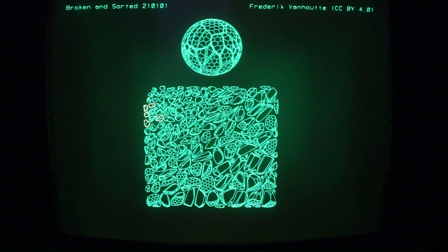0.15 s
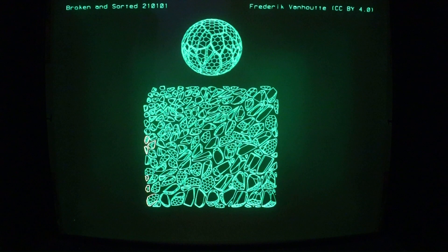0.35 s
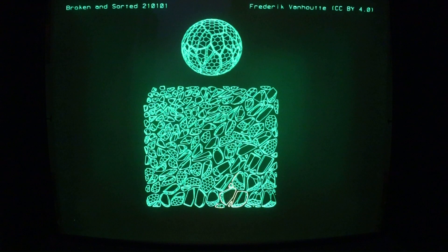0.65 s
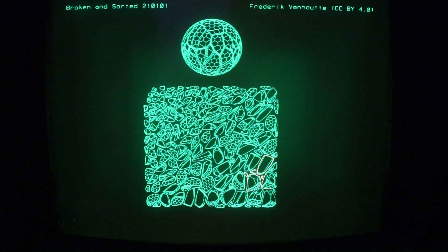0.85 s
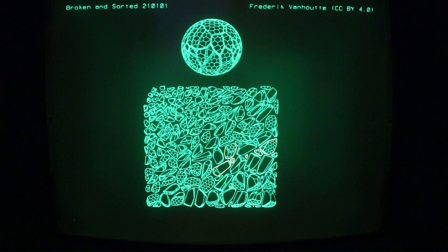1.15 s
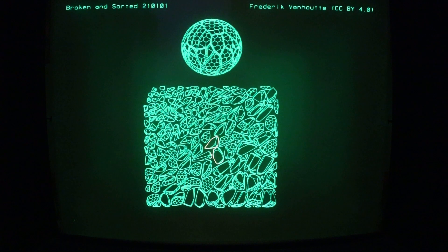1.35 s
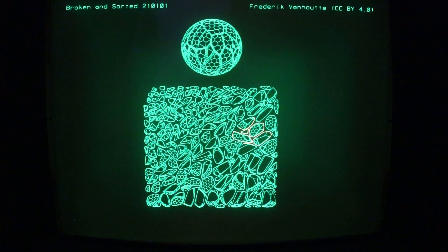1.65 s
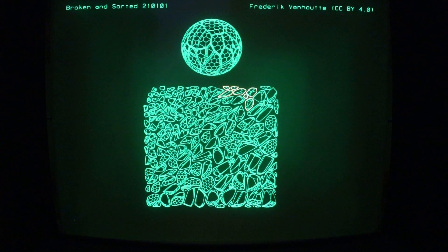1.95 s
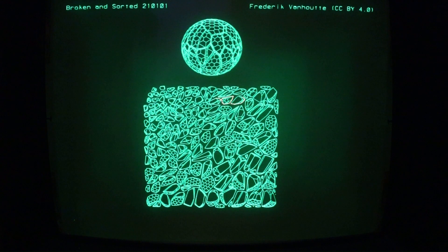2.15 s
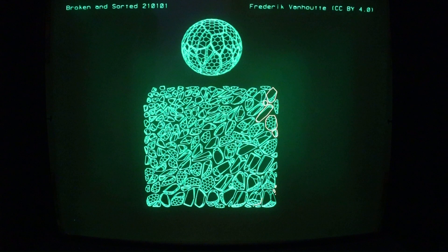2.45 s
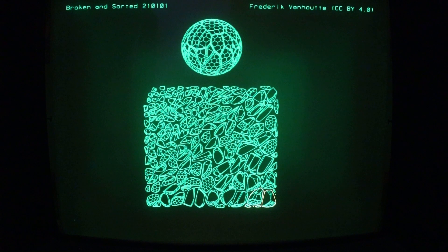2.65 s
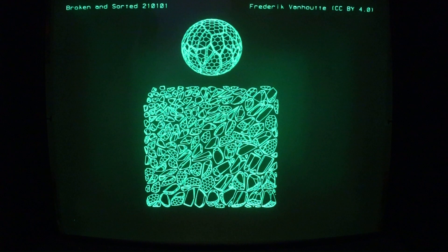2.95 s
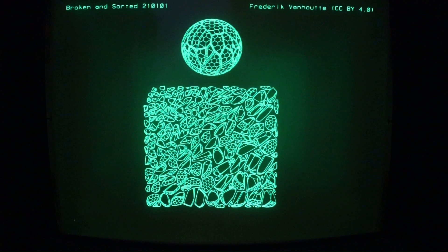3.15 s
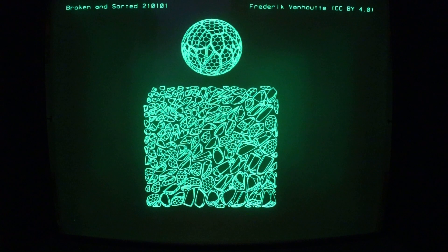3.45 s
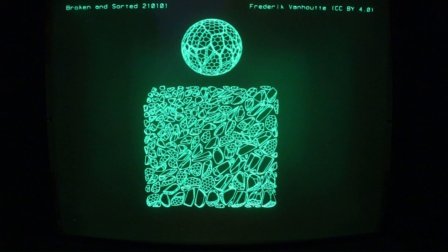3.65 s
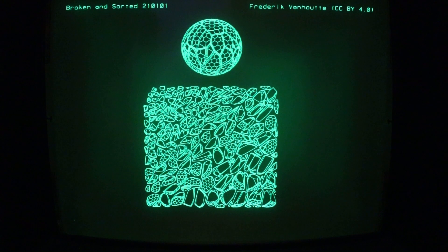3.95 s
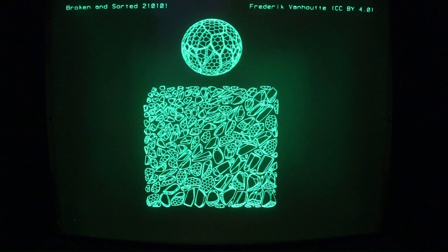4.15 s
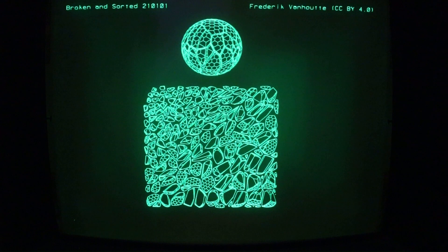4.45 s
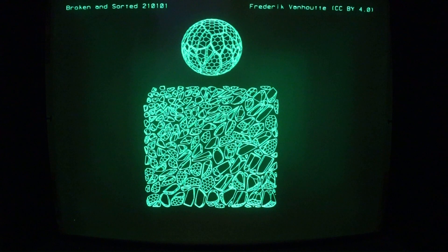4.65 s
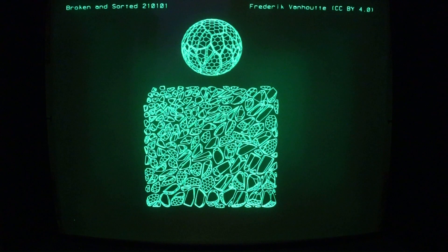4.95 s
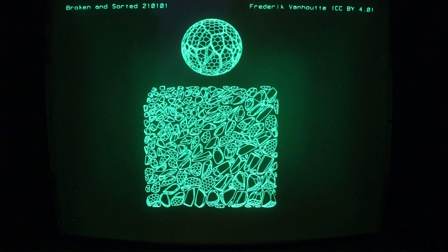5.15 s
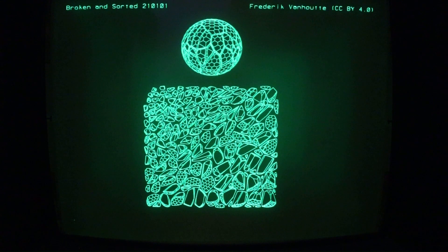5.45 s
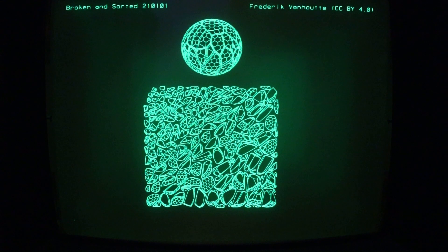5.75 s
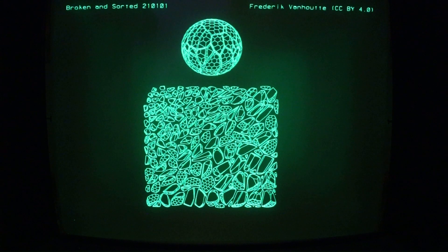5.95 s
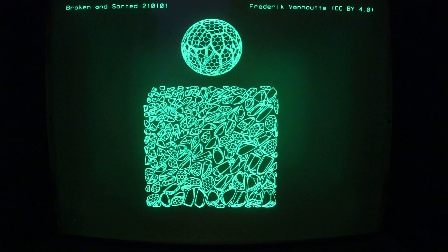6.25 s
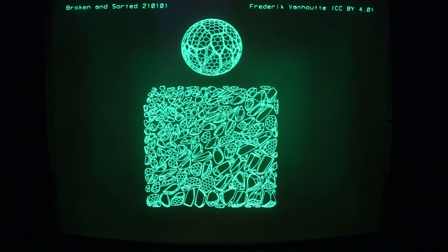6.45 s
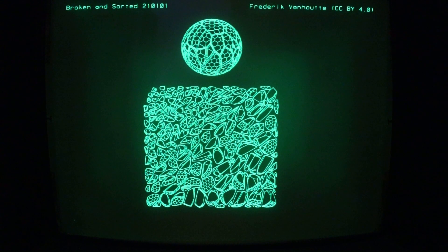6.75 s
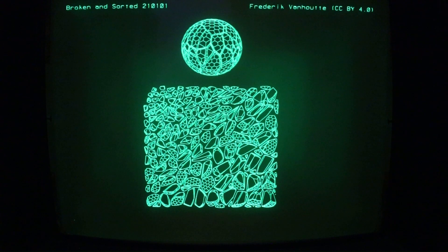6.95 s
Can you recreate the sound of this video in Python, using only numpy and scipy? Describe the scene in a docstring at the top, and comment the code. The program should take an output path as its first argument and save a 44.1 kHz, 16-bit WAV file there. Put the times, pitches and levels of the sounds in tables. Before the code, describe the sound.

An old computer is already running in a quiet indoor room, heard close in stereo for about seven seconds. Two cooling fans give a steady drone of several even tones, from a low hum around 120 to 150 hertz up to a clear nasal note near 550 to 670. Transformer hum beats slowly with them. Soft airflow rushes underneath, boxy and dull, wider in its upper part, with barely audible thin high whines. Faint brushes of treble rustle come at about 0.3 and 0.7 seconds, each gone in an instant. From 2 to 6 seconds the slower fan sags minutely in pitch and grows slightly fuller, easing back near 7. Another faint rustle passes at 3.3, then slightly clearer ones at 4.9, 5.4 and 6.3. The hum continues unbroken to the end.

```python
"""An old computer runs in a quiet room, heard by a close pair of microphones. From the start two mains-driven
fans turn almost steadily: each sings multiples of its shaft speed, some shifted by the magnetic pull at twice
the mains frequency. The transformer hums at multiples of that pull, thin whines sit on top as lone wandering
sines, and air rushes as shaped noise lifted by case and room resonances.
Now and then, first within the opening second, a faint rustle swells and fades as treble noise."""
import sys
import numpy as np
from scipy import signal
from scipy.fft import rfft, irfft, next_fast_len
from scipy.io import wavfile
from scipy.ndimage import uniform_filter1d, map_coordinates

SR = 44100
rng = np.random.default_rng(int(sys.argv[2]) if len(sys.argv) > 2 else 0)


def volts(x):
    """Linear amplitude factor 10**(x/20) for a level x in dB, scalar or array-like."""
    e = np.asarray(x, float) / 20
    return 10 ** e


def generate_wav(signal):
    """Clip the signal to [-1, 1] and save it as 16-bit WAV at the path in sys.argv[1]."""
    frames = np.transpose(np.atleast_2d(signal))
    scaled = np.clip(frames, -1, 1) * 32767
    pcm = np.round(scaled).astype(np.int16)
    wavfile.write(sys.argv[1], SR, pcm)


N = 313110  # samples


def along(points, hz):
    """Reads a curve of (Hz, value) points on a logarithmic frequency axis."""
    point_hz, value = np.transpose(points)
    return np.interp(np.log(hz + 1), np.log(point_hz + 1), value)


def wobble(knots_per_s):
    """A smooth random curve through normally distributed knots."""
    knots = rng.standard_normal(int(N * knots_per_s / SR) + 4)
    return map_coordinates(knots, [np.arange(N) * knots_per_s / SR])


def filtered(x, response):
    """Shapes x by a gain that depends on frequency."""
    size = next_fast_len(N + 8192)
    hz = np.fft.rfftfreq(size, 1 / SR)
    return irfft(rfft(x, size) * response(hz), size)[..., :N]


def tone(turns, left_db, right_db, lead_rad):
    """A sine at both microphones from its running count of cycles; levels are rms."""
    level = np.sqrt(2) * volts([[left_db], [right_db]])
    return level * np.cos(2 * np.pi * turns + [[lead_rad / 2], [-lead_rad / 2]])


def motor(shaft_turns, tones, unsteady_db):
    """Multiples of shaft speed, shifted up or down by the magnetic pull; each tone wavers in level."""
    pull_hz = 120.03  # twice the mains frequency
    pull_turns = pull_hz * np.arange(N) / SR
    total = 0
    for shaft_multiple, pull_multiple, *heard in tones:
        # in cycles: the case spreads the tones, so they never peak together
        lag = .0135 * shaft_multiple ** 2 - .09 * pull_multiple ** 2
        turns = shaft_multiple * shaft_turns + pull_multiple * pull_turns + lag
        total = total + volts(unsteady_db * wobble(2.97)) * tone(turns, *heard)
    return total


def fast_fan():
    """The faster fan loses speed very slowly, so its tones sink slightly in pitch."""
    start_turns_per_s, sag_per_s = 51.315, .0055  # sag in turns/s lost each second
    # fan tones, levels before the waver:
    # shaft_multiple, pull_multiple, left_db (rms), right_db (rms), left_lead_rad
    fan_tones = [(1.0, 0.0, -61.0, -61.0, -0.0), (3.0, 0.0, -40.0, -39.0, 0.0),
                 (5.0, 0.0, -51.0, -50.0, 0.0), (6.0, 0.0, -39.0, -39.0, -0.1),
                 (9.0, 0.0, -43.0, -44.0, 0.2), (9.0, 1.0, -56.0, -55.0, 0.1),
                 (11.0, 0.0, -58.0, -59.0, -0.1), (12.0, 0.0, -60.0, -57.0, 0.1),
                 (13.0, -1.0, -39.0, -40.0, -0.1), (13.0, 0.0, -38.0, -37.0, 0.7),
                 (13.0, 1.0, -51.0, -44.0, -0.0), (14.0, 0.0, -64.0, -65.0, 0.5),
                 (15.0, 0.0, -59.0, -56.0, 0.5), (18.0, 0.0, -61.0, -69.0, 1.2),
                 (20.0, 0.0, -81.0, -74.0, 0.3)]
    speed = start_turns_per_s - sag_per_s * np.arange(N) / SR
    return motor(np.cumsum(speed) / SR, fan_tones, unsteady_db=0.37)


def slow_fan():
    """The slower fan drifts in speed and grows louder as it slows."""
    start_turns = .15  # shaft angle at the start; the fan beats with the transformer
    swell_db_per_turn = 13  # dB for each turn/s under its mean speed
    # drift of the shaft speed: time_s, speed_turns_per_s
    speed_curve = [(0, 39.275), (2.2, 39.262), (4.1, 39.185), (6.1, 39.148), (7.1, 39.21)]
    # fan tones, levels before swell and waver:
    # shaft_multiple, pull_multiple, left_db (rms), right_db (rms), left_lead_rad
    fan_tones = [(3.0, 0.0, -43.0, -43.0, 0.0), (6.0, 0.0, -46.0, -46.0, 0.0),
                 (9.0, 0.0, -51.0, -57.0, -0.0), (12.0, 0.0, -53.0, -59.0, -0.3),
                 (12.0, 1.0, -63.0, -63.0, 0.4), (13.0, 0.0, -62.0, -60.0, 1.7),
                 (13.0, 1.0, -41.0, -42.0, 0.3), (13.0, 2.0, -52.0, -59.0, -0.4),
                 (13.0, 3.0, -73.0, -60.0, 0.6), (21.0, 0.0, -63.0, -57.0, 0.6),
                 (27.0, 0.0, -61.0, -60.0, 0.8), (30.0, 0.0, -85.0, -65.0, 0.4),
                 (36.0, 0.0, -65.0, -63.0, 0.3), (45.0, 0.0, -70.0, -67.0, 0.3)]
    speed = np.interp(np.arange(N) / SR, *np.transpose(speed_curve))
    swell = volts(swell_db_per_turn * (speed.mean() - speed))
    return swell * motor(np.cumsum(speed) / SR + start_turns, fan_tones, unsteady_db=1.0)


def transformer():
    """The transformer has no shaft: it hums at plain multiples of the magnetic pull."""
    # hum tones, levels before the waver:
    # shaft_multiple, pull_multiple, left_db (rms), right_db (rms), left_lead_rad
    hum_tones = [(0.0, 1.0, -41.0, -41.0, 0.0), (0.0, 2.0, -51.0, -50.0, 0.2),
                 (0.0, 3.0, -55.0, -55.0, 0.1), (0.0, 4.0, -58.0, -58.0, -0.3),
                 (0.0, 6.0, -61.0, -64.0, 0.4)]
    return motor(0, hum_tones, unsteady_db=1.6)


def whines():
    """Lone sines whose pitch wanders slightly."""
    # thin whines: pitch_hz, left_db (rms), right_db (rms), left_lead_rad, wander_hz
    whine_tones = [(214.45, -49, -49, .1, .15), (1026.8, -64, -61, .4, .6), (2269, -73, -69, .8, 3),
                   (5152, -84, -84, 0, 3), (8985, -90, -90, 3.1, 3), (10670, -94, -89, 2.8, 2),
                   (11484, -87, -87, 3, 3)]
    total = 0
    for pitch_hz, *heard, wander_hz in whine_tones:
        pitch = pitch_hz + wander_hz * wobble(4)
        total = total + tone(np.cumsum(pitch) / SR, *heard)
    return total


def rush(spectrum, peaks, patchy_db):
    """Turbulent noise with faint patches of random gain, lifted at flat-topped resonances."""
    bins = signal.stft(rng.standard_normal(N), nperseg=512)[2]
    # each patch spreads over 40 frequency bins and 6 time frames
    patches = uniform_filter1d(rng.standard_normal(bins.shape), 40, 0)
    patches = uniform_filter1d(patches, 6, 1)
    gain = volts(patchy_db * patches / patches.std())
    noise = signal.istft(bins * gain, nperseg=512)[1][:N]

    def response(hz):
        lift = 1  # in power
        for center_hz, width_hz, added_db in peaks:
            lift = lift + volts(added_db) ** 2 / (1 + (2 * (hz - center_hz) / width_hz) ** 4)
        return volts(along(spectrum, hz)) * np.sqrt(lift * SR / 2)

    return filtered(noise / noise.std(), response)


def air():
    """Low air noise reaches both microphones alike; the treble arrives from the sides, partly opposed."""
    # air noise alike at both microphones, before resonances and tilt: pitch_hz, level_db (per Hz)
    common_spectrum = [(22, -81), (50, -75.5), (95, -78.5), (140, -62.5), (270, -73.5), (400, -72),
                       (800, -73.5), (1150, -79.5), (1750, -86), (3000, -87), (5700, -102), (8500, -108),
                       (10800, -108.5), (11600, -114.5), (13000, -119), (14500, -129)]
    # air noise opposed between the microphones, before resonances and tilt: pitch_hz, level_db (per Hz)
    opposed_spectrum = [(22, -103), (50, -97), (115, -85.5), (200, -79), (400, -80.5), (800, -83.5),
                        (1150, -82), (1750, -84.5), (3000, -85), (5500, -96), (8500, -103), (10500, -103),
                        (12500, -112), (15000, -119)]
    # case and room resonances of each part: center_hz, width_hz, added_db (added power over that noise)
    common_peaks = [(83.4, 36, 9), (114.2, 15, 16.5), (171.3, 7.9, 14.5), (197.8, 19, 12),
                    (234.5, 14.6, 15.5), (256, 15.6, 11.5), (296.8, 31, 14), (329, 3.4, 13), (341, 43, 8),
                    (385, 17, 4.5), (435, 10, 4), (475.4, 20, 7.5), (525, 19.6, 8.5), (579, 18, 8),
                    (682, 40, 3), (773, 70, 0), (983, 18, 9), (986, 120, 1.5), (1305, 33, 1.4),
                    (1478, 134, 3), (1616, 104, 2), (1754, 15, 10.5), (1993, 80, 3.5), (1860, 30, 5),
                    (1923, 70, 2), (2210, 190, 2.5), (2426, 77, 2.5), (4700, 1160, -1.5)]
    opposed_peaks = [(154, 45, 7), (273, 20, 2), (356, 29, 3), (413, 45, 7), (489, 40, 0), (721, 240, 2),
                     (970, 72, 4.5), (1463, 130, 0), (2213, 130, .1), (3255, 164, -8)]
    # balance of the microphones: pitch_hz, left_minus_right_db
    balance = [(60, 0.5), (130, -1.0), (270, 0.0), (590, 0), (1260, -1.5), (2690, -2), (5760, -0.5),
               (12300, -1)]
    common = rush(common_spectrum, common_peaks, patchy_db=0.6)
    opposed = rush(opposed_spectrum, opposed_peaks, patchy_db=0.35)
    pair = np.array([common + opposed, common - opposed])
    return filtered(pair, lambda hz: volts(along(balance, hz) * [[.5], [-.5]]))


def rustles():
    """Short soft swells of treble noise, unrelated at the two microphones."""
    rise_s, fall_s = .015, .04  # exponential time constants
    # faint rustles in the room: peak_s, level_db (rms at the peak)
    rustle_peaks = [(.27, -66), (.73, -65), (3.28, -66), (4.89, -61), (5.42, -58), (6.3, -60)]
    # rustle colour: pitch_hz, relative_level_db (per Hz)
    colour = [(1500, -40), (3000, -3), (5000, 0), (9000, -9), (12500, -12), (15000, -30)]
    t = np.arange(N) / SR
    swells = 0
    for peak_s, level_db in rustle_peaks:
        pace_s = np.where(t < peak_s, rise_s, fall_s)
        swells = swells + volts(level_db) * np.exp(-np.abs(t - peak_s) / pace_s)
    hiss = filtered(rng.standard_normal((2, N)), lambda hz: volts(along(colour, hz)))
    return swells * hiss / hiss.std()


def scene():
    """Everything that reaches the microphones."""
    machine = fast_fan() + slow_fan() + transformer()
    return machine + whines() + air() + rustles()


def low_pass(x):
    """Removes everything above the highest recorded frequency."""
    return signal.sosfilt(signal.butter(12, 15140, fs=SR, output="sos"), x)


def record(dry):
    """Hands over the finished mix of both microphones."""
    return low_pass(dry)


dry = scene()
out = record(dry)
generate_wav(out)
```